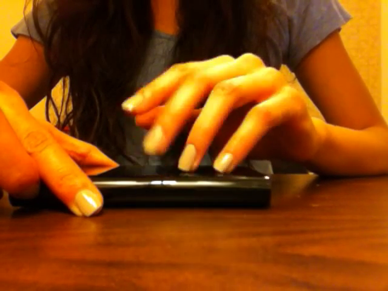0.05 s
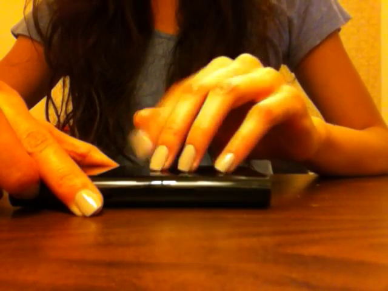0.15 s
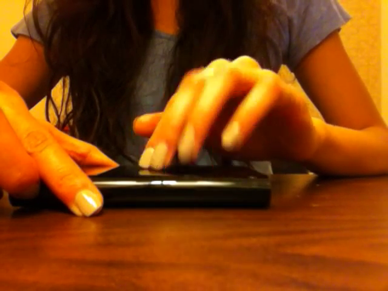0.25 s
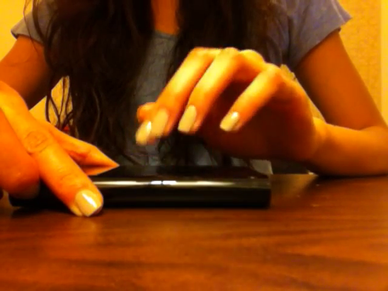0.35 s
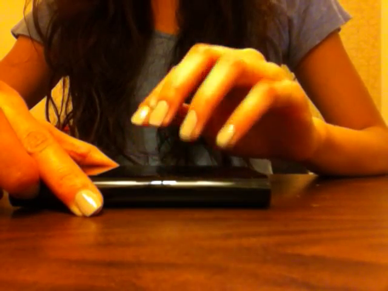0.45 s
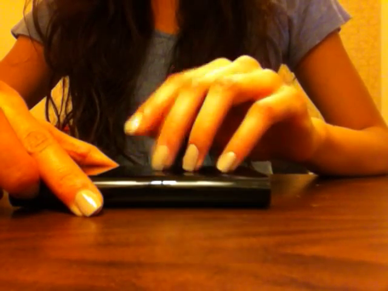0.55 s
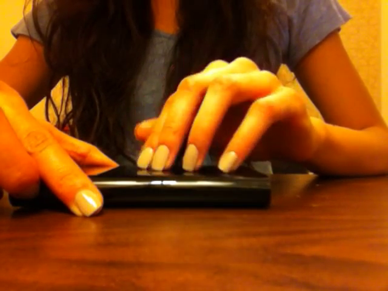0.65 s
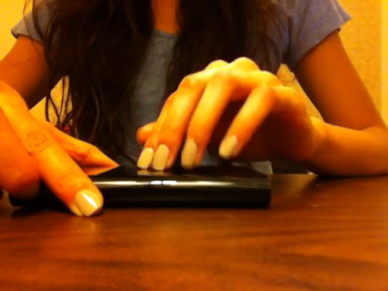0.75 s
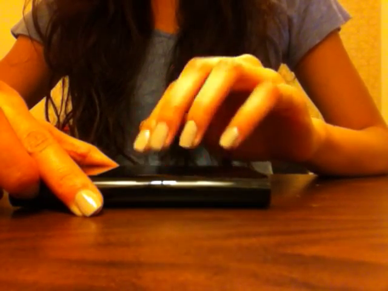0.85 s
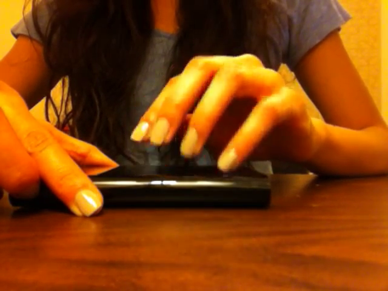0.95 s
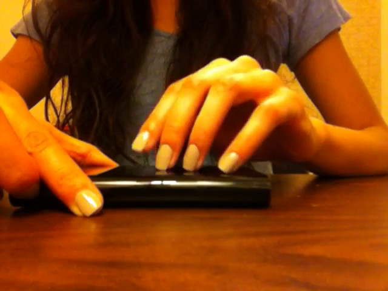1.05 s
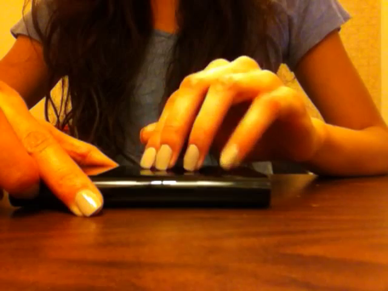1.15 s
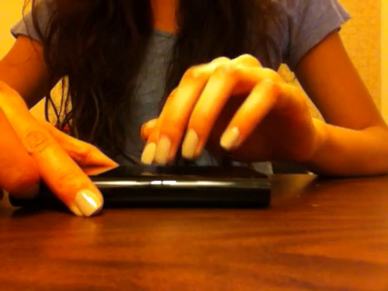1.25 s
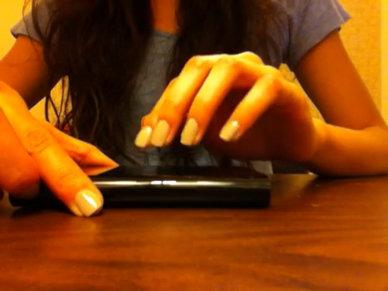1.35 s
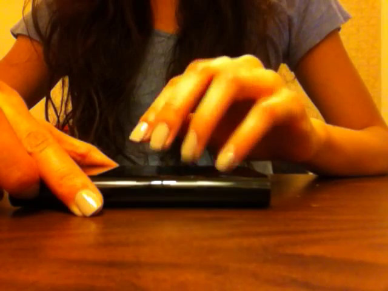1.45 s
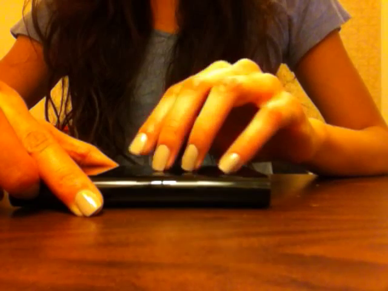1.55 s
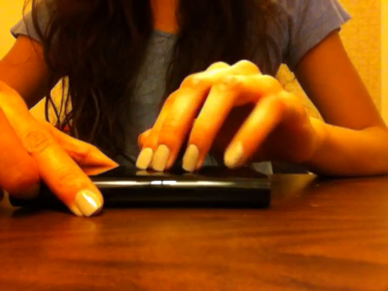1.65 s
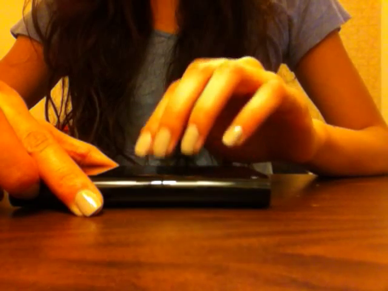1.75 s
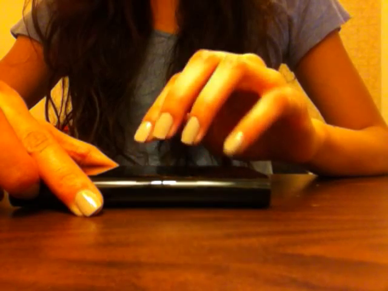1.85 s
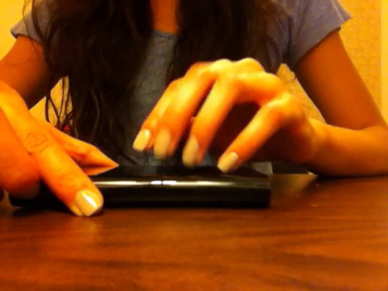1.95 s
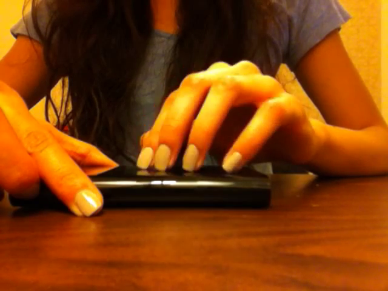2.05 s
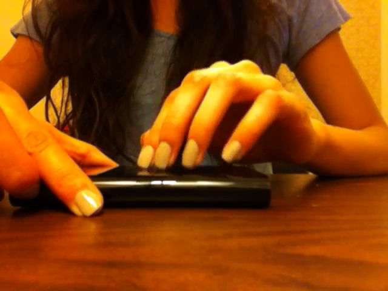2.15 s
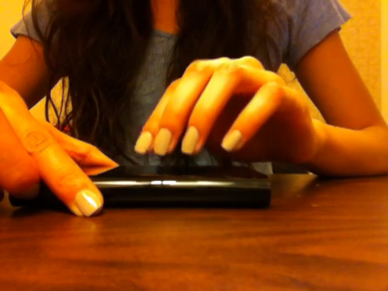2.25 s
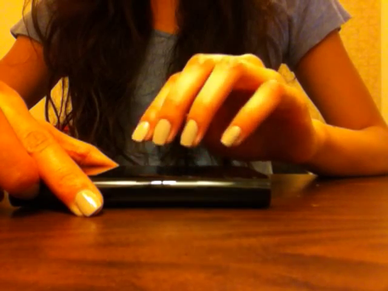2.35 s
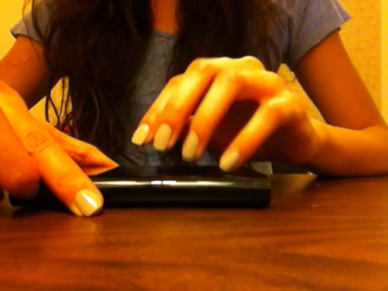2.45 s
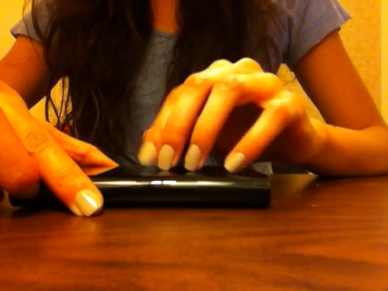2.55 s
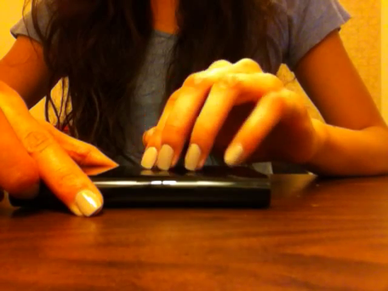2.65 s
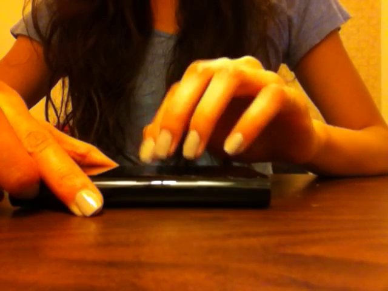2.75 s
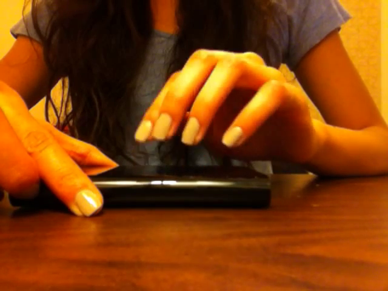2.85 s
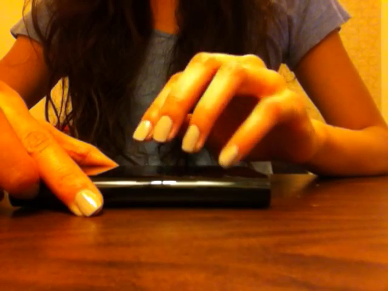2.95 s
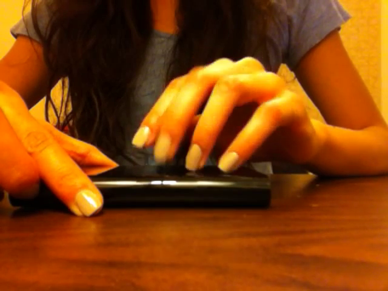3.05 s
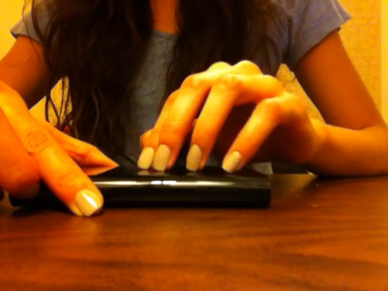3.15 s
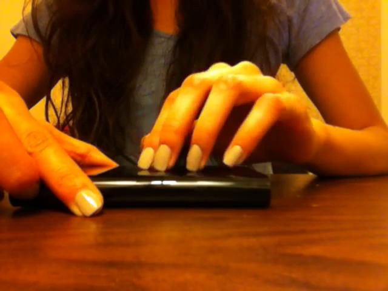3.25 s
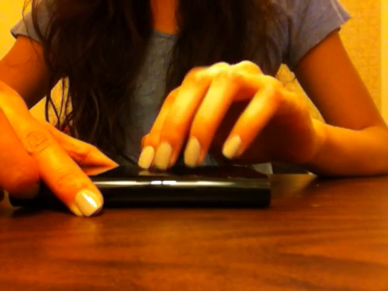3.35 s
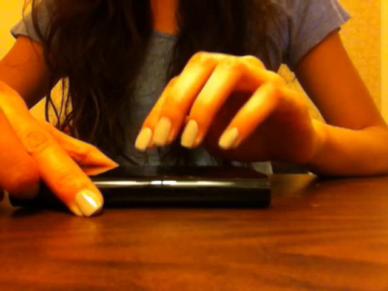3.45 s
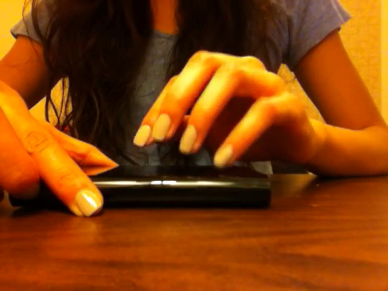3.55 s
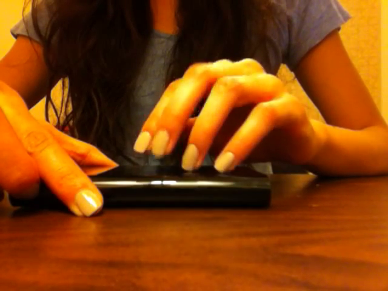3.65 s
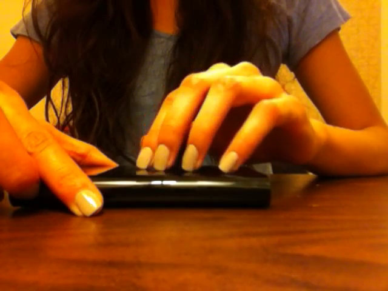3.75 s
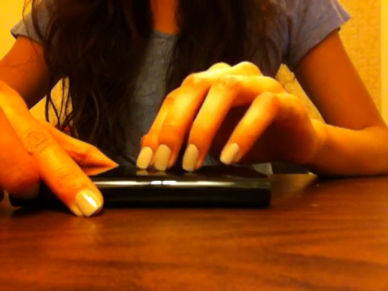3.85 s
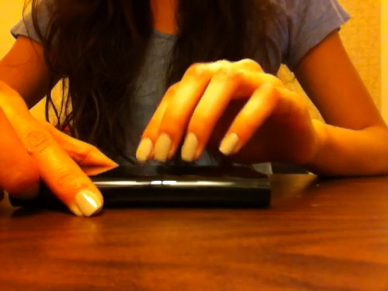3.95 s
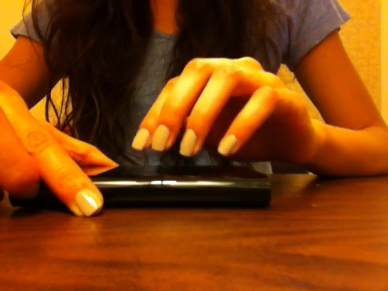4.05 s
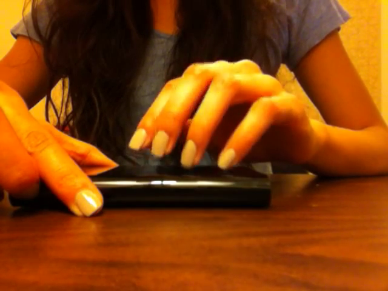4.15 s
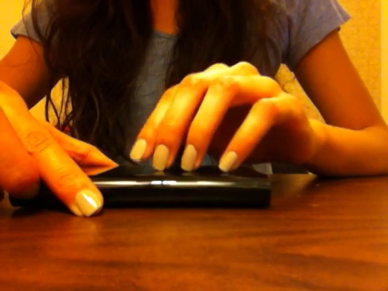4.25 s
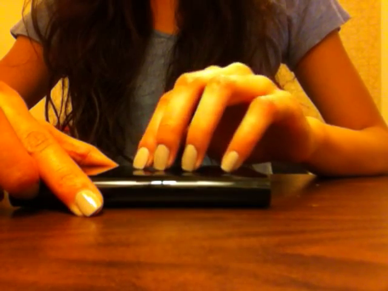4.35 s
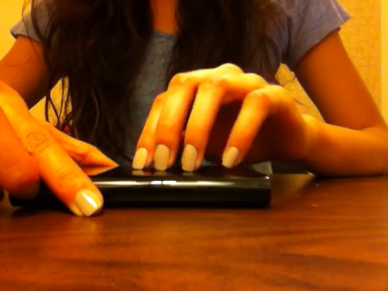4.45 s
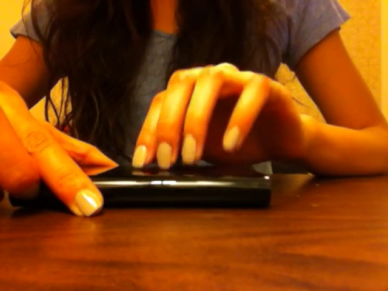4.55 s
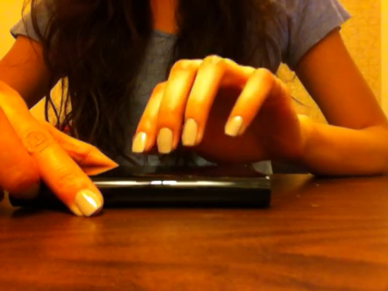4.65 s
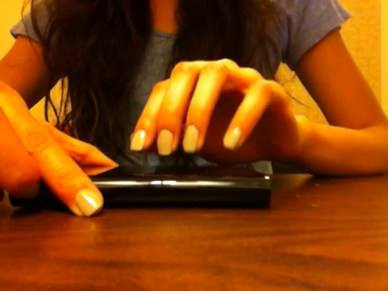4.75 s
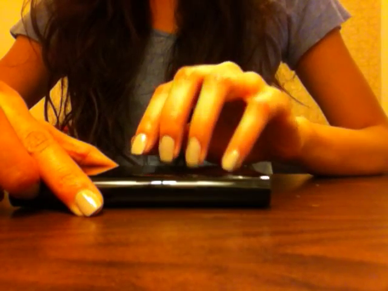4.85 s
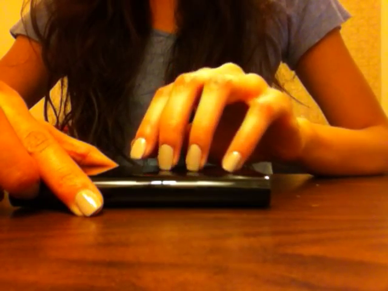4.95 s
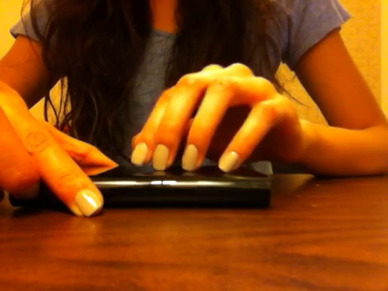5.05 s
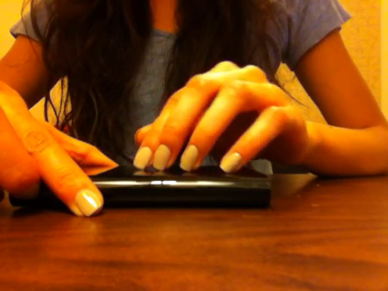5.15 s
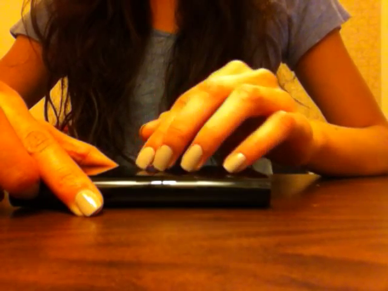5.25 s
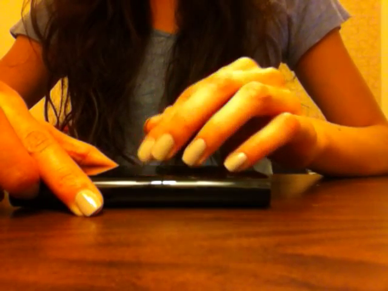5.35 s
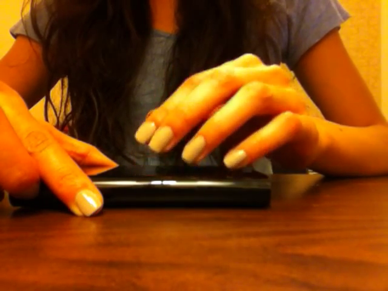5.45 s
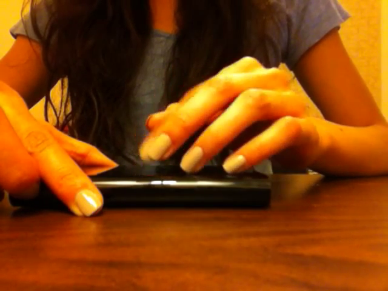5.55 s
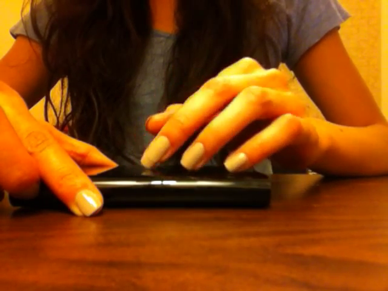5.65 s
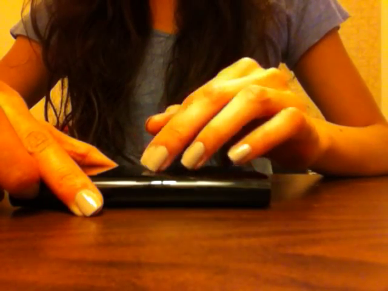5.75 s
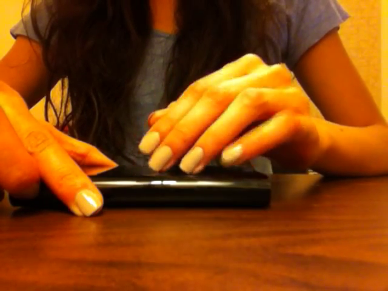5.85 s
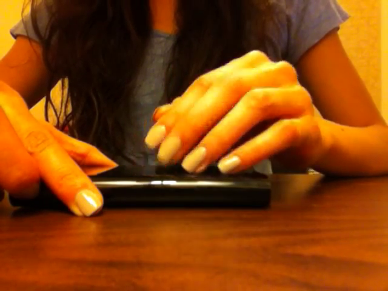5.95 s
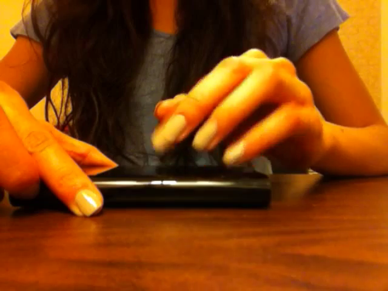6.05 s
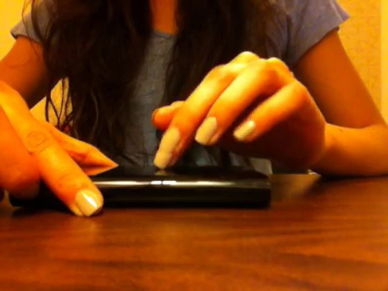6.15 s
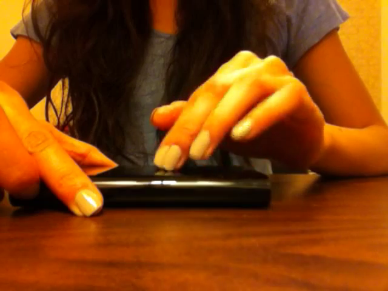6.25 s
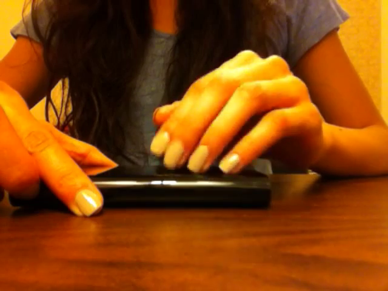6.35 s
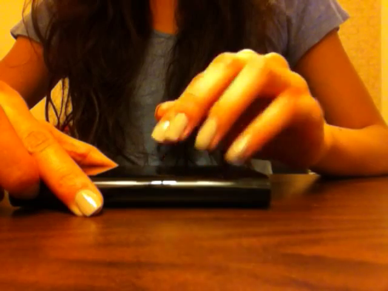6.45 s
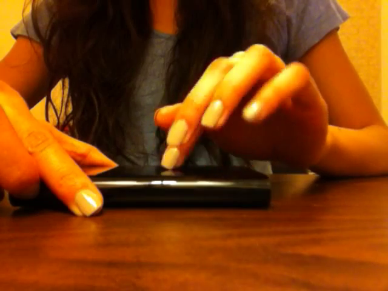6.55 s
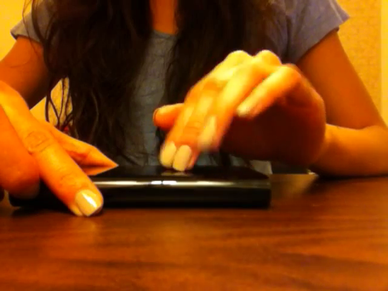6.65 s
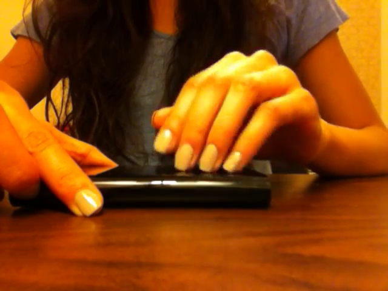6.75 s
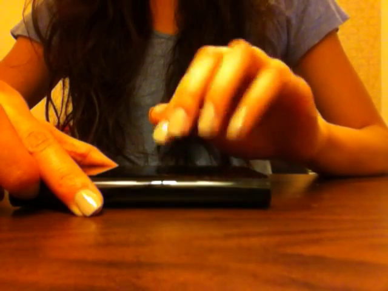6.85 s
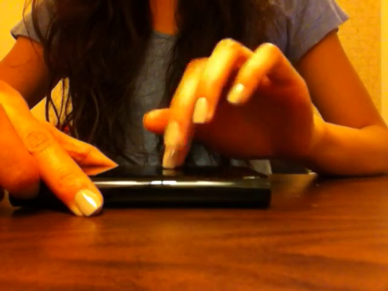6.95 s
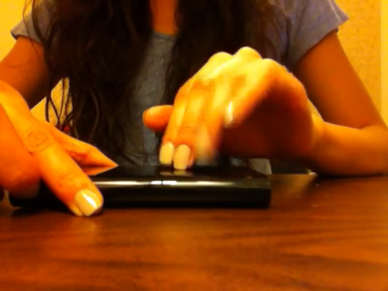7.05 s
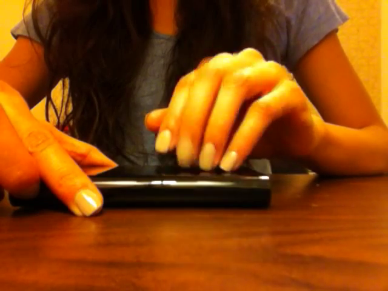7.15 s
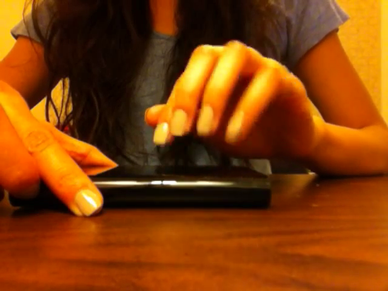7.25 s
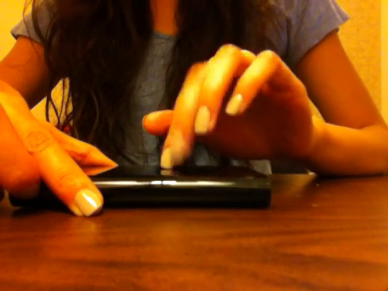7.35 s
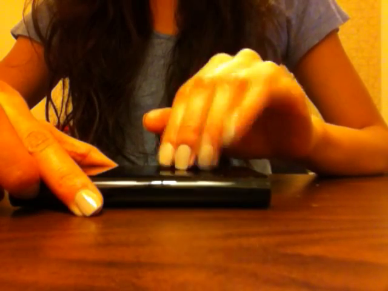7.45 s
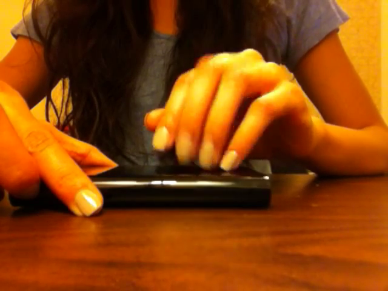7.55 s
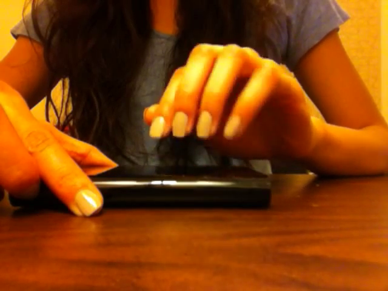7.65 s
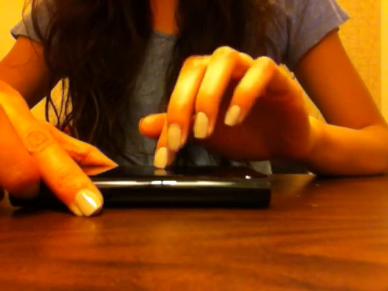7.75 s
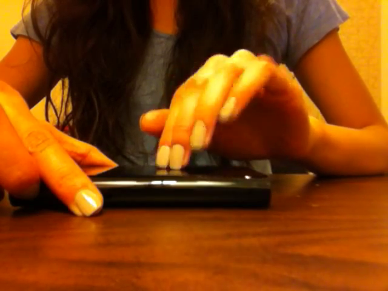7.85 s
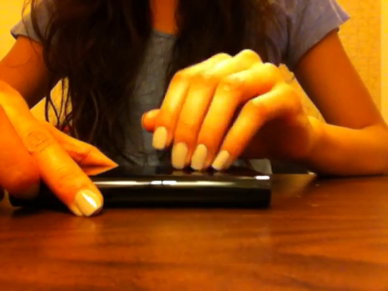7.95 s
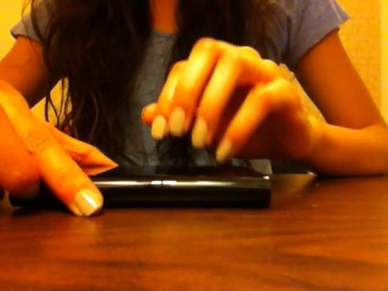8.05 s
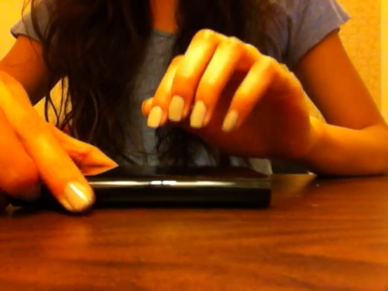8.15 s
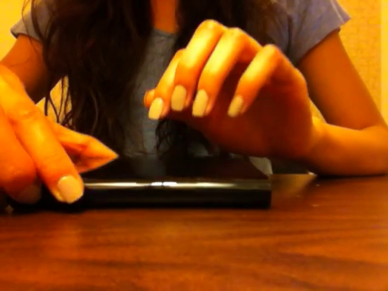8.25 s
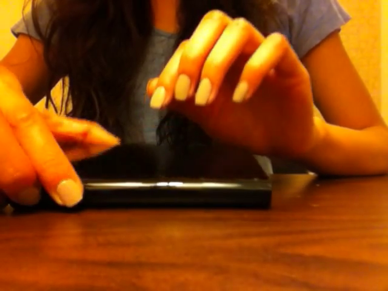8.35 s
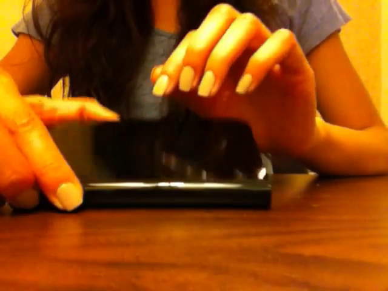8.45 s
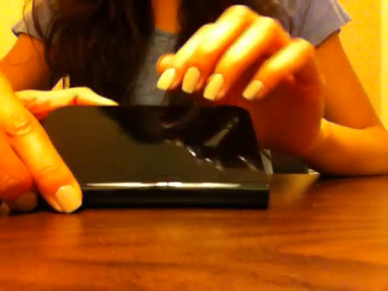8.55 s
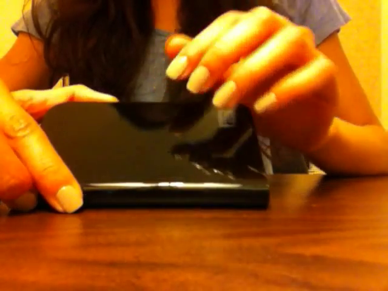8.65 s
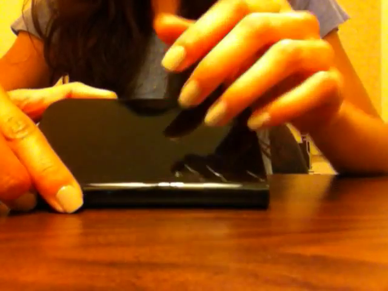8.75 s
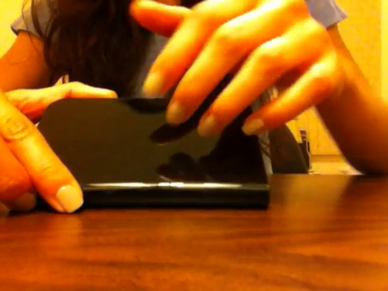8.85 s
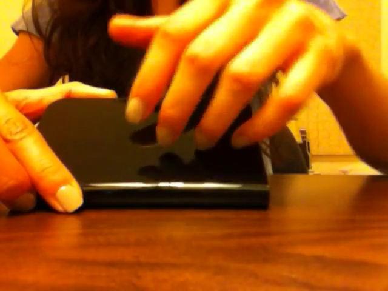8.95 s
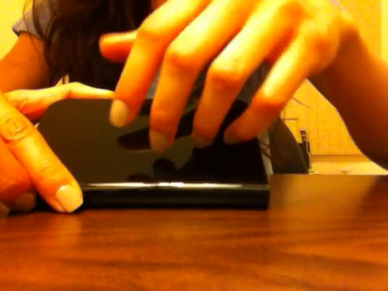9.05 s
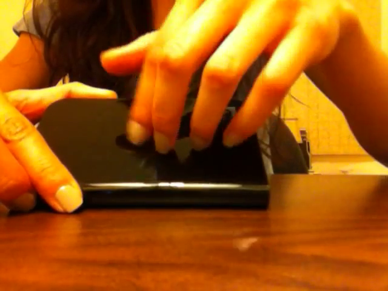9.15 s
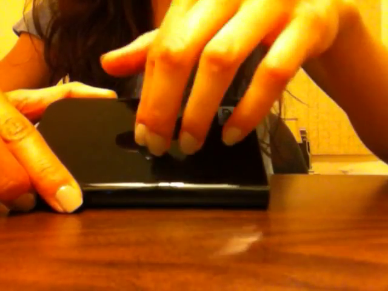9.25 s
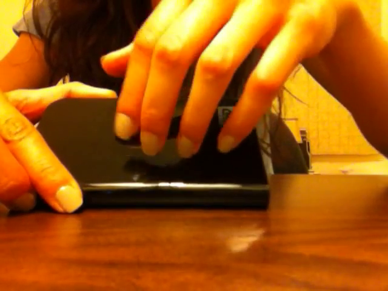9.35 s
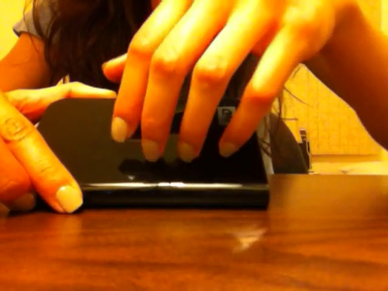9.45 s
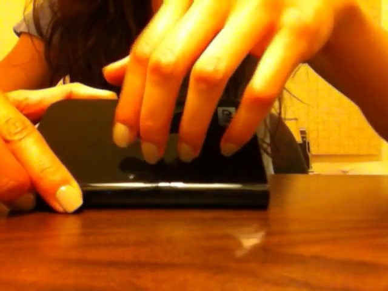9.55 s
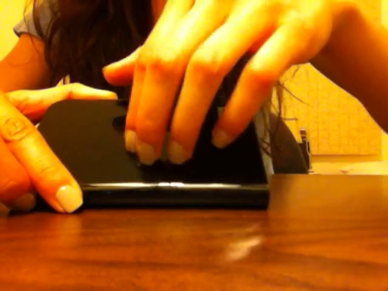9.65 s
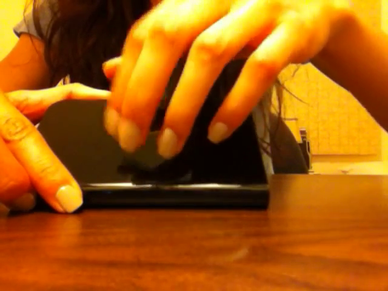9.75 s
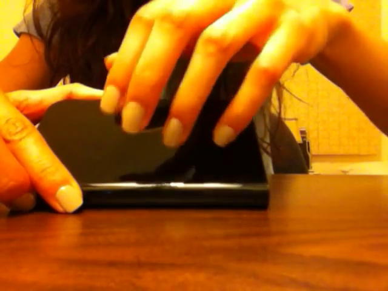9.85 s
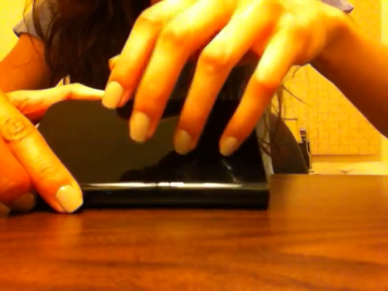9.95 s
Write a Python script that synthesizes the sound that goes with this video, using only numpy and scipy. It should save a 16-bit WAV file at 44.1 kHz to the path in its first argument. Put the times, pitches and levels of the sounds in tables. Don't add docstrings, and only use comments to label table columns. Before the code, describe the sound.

Crisp, dry nail clicks roll little finger to index on a phone's glass, reverse and grow louder, then thin out in a small quiet room.

```python
import sys
import numpy as np
from scipy import signal
from scipy.fft import rfft, irfft
from scipy.io import wavfile
from scipy.ndimage import uniform_filter1d, minimum_filter1d

SR = 44100
rng = np.random.default_rng(int(sys.argv[2]) if len(sys.argv) > 2 else 0)


def output_pcm(signal):
    pcm = np.clip(np.atleast_2d(signal).T, -1, 1) * 32767
    wavfile.write(sys.argv[1], SR, np.round(pcm).astype(np.int16))


def amplitude_ratio(level_db):
    exponent = np.asarray(level_db, float) / 20
    return 10 ** exponent


N = 440559

# frequency in Hz, density in dB per Hz.
NOISE_SHAPE = [(12, -59), (20, -32), (48, -12), (151, -4.5), (174, -5), (267, -10.5), (299, -3),
               (325, -11.5), (644, -16), (1280, -20), (2010, -22), (3660, -23.5), (15200, -27),
               (16500, -41), (18000, -23.5)]
NOISE_DB = -53.5
# frequency in Hz, line width in Hz, level in dB.
HUM_LINES = [
    (119, 14, -71),
    (301, .4, -65),
    (14993, .05, -78),
]

# frequency in Hz, level in dB, T60 in seconds,
# change in dB once the phone is tilted off the table.
PLATE_MODES = [(3237, -9, 0.015, -7), (3450, -4.5, 0.013, -8), (3523, -15.5, 0.033, -5)]
THUD_MODES = [(116, -7, 0.028, 4.5), (230, -9.5, 0.04, -27), (292.3, -0.5, 0.043, 8.5),
              (375, 0.5, 0.044, 6.5), (443.2, 3.5, 0.057, -1), (526, -0.5, 0.033, -4)]
BEND_MODES = [(668, -1.8, 0.0074, .1), (715, -2, 0.021, .1), (789.6, 1.54, 0.03, .1)]
TWIST_MODES = [(1008, 3, 0.019, 0.11), (1167, 1.5, 0.012, 0.11), (2381, 1.5, 0.021, 0.11)]
SECOND_BEND_MODES = [(1469, -24, 0.073, 16.5), (1574, 4, 0.017, -3), (1770, -8.5, 0.02, 10),
                     (1885, -9.5, 0.033, -12)]
# low edge in Hz, high edge in Hz.
RADIATED_BANDS = [
    (3173, 3440),
    (118, 318),
    (506, 762),
    (764, 1156),
    (1160, 1622),
]
POLARITY = (1, -1, 1, 1, 1)
TILTED_FROM_S = 8.15

# frequency in Hz, level in dB, T60 in seconds.
CHATTER_MODES = [(4100, -17, 0.0062), (4686, -6, 0.0036), (5060, -16, 0.0029), (6380, -16, 0.0028),
                 (7610, -28, 0.012), (9300, -62, 0.0039), (9820, -29, 0.0064), (12500, -45, 0.0036),
                 (14400, -37, 0.0018)]
# frequency in Hz, T60 in seconds.
FINE_MODES = [(4100, 0.013), (4800, 0.0095), (5300, 0.0091), (5900, 0.017), (6800, 0.014), (7700, 0.02),
              (8700, .008), (10500, 0.014)]
# level of every fine mode in dB over the snap, one row per landing spot.
FINE_DB_BY_SPOT = [(-9.5, -23, -24, -15.5, -12, -31, -53, -35), (-18, -11, -22, -15, -30, -35, -42, -36),
                   (-36, -10, -21, -31, -32, -30, -42, -29), (-7, -16.5, -35, -17.5, -26, -19, -34, -35),
                   (-4.5, -13, -36, -16, -20, -27, -28, -27), (-28, -14, -25, -41, -34, -28, -34, -27),
                   (-14, -10.5, -12, -21, -22, -28, -34, -27), (-24, -19, -7, -28, -14, -27, -42, -37),
                   (-23, -14.5, -26, -15, -30, -15, -30, -21), (-19, -16, -26, -22, -24, -24, -30, -32),
                   (-36, -15, -17, -31, -27, -28, -37, -32), (-23, -5, -21, -28, -24, -22, -32, -24),
                   (-19, -26, -19, -22, -24, -24, -30, -32)]

# start in seconds, knock of the slab in dB, snap of the nail in dB.
LITTLE = [(.4372, -22, -21), (.8791, -29.5, -27.5), (1.3814, -23, -23), (1.8682, -32, -38),
          (2.4108, -28.5, -28), (2.9377, -32.5, -32), (3.53, -30.5, -30), (4.131, -36, -32),
          (4.808, -26.5, -27.5)]
RING = [(0.4493, -25, -22), (0.9258, -30, -26), (1.4073, -28.5, -24.5), (1.9315, -31.5, -26),
        (2.448, -32, -27), (2.9999, -30, -25.5), (3.6079, -44.5, -42), (4.1243, -36.5, -38),
        (4.8298, -39.5, -50)]
MIDDLE = [(0.4817, -24.5, -20), (0.9561, -24.5, -18), (1.4462, -28.5, -20), (1.9451, -23, -17.5),
          (2.4824, -27.5, -21), (3.045, -31, -22.5), (3.673, -30, -24), (4.1783, -31, -24),
          (4.8981, -38, -34.5)]
INDEX = [(0.5754, -35.5, -36.5), (1.0638, -33.5, -26.5), (1.5295, -27.5, -22.5), (1.9927, -30.5, -25),
         (2.5303, -32, -26), (3.0989, -26.5, -20), (3.6954, -30, -27.5), (4.2574, -32.5, -27.5),
         (5.0368, -34.5, -29), (9.1226, -33, -28.5), (9.5485, -26.5, -19)]
INDEX_BACK = [(5.5368, -30, -30), (6.0591, -26.5, -24.5), (6.4701, -21.5, -19), (6.869, -23.5, -19.5),
              (7.267, -22, -17.5), (7.6956, -21.5, -17.5)]
MIDDLE_BACK = [
    (5.68, -36, -28),
    (6.1548, -32, -21.5),
    (6.5669, -28.5, -19),
]
MIDDLE_FAR = [
    (6.9498, -28, -21.5),
    (7.33, -24, -16),
    (7.7606, -22.5, -16),
]
RING_BACK = [(5.7512, -41.5, -42.5), (5.8302, -38.5, -37), (6.2417, -27.5, -26.5), (6.6509, -22.5, -22.5),
             (7.0302, -21, -23), (7.4166, -18, -19), (7.85, -18, -19)]
LITTLE_BACK = [
    (6.697, -60, -44),
    (7.067, -22.5, -21),
    (7.4521, -21, -22.5),
    (7.7837, -56, -45),
    (7.895, -23.5, -23),
]
TOUCHES = [
    (0.0208, -49, -52.5),
    (0.1046, -41.5, -44),
    (5.46, -52.5, -51),
    (8.0596, -41, -45),
    (8.1264, -56, -57),
]
TILTED_FLAT = [
    (8.8908, -29.5, -33),
    (9.0403, -25, -21.5),
    (9.3867, -33.5, -33.5),
    (9.42, -38.5, -33),
]
TILTED_EDGE = [
    (8.9312, -34.5, -41),
    (9.3987, -34.5, -32),
    (9.8913, -30, -30),
]
SET_DOWN = [
    (8.2014, -36.5, -61),
]
# table thud in dB, first bend in dB, twist in dB, second bend in dB,
# plate ring in dB over the snap, snap tilt in dB per octave.
SPOTS = [(-15, -18, -1.8, -6, -5.5, 0), (0.8, -1, 1.5, 0.5, -1.5, -4), (0.45, 2.1, -6, -2.5, 4, -14),
         (-9.5, 3, -2.5, -4, -3.5, -3), (-9, 2.9, -1, 1, -2.2, 0), (0.9, 3.5, 2.5, 2.5, 6, -33),
         (-0.2, 2, 0.5, 1.5, -5.5, -5), (-8.5, -9.5, -0.5, -4.5, -3.5, -3), (-16, -17, -1.4, -3, -7.5, 1.2),
         (-3.5, 0, .1, -1, 2.5, 3), (-2.5, -3.5, -3.5, -4, 5.5, -17), (-10.5, -9, -2, 0.5, 1.5, 6),
         (-3, -12, -2.5, -7, 0, -5)]

# delay in seconds, level in dB.
ECHOES = [(.0085, -21.5), (0.0152, -28.5), (0.022, -38), (.025, -46), (0.032, -28)]
# frequency in Hz, level in dB, T60 in seconds.
TAIL = [(109, -38, 0.73), (259, -31, 0.18), (482, -37, 0.24), (1166, -38, 0.26), (1960, -39.5, 0.24),
        (4400, -43, 0.24), (7100, -42, 0.26)]
# frequency in Hz, level in dB, T60 in seconds.
STANDING_WAVES = [(120.2, -51.5, 0.2), (310.5, -42.5, 0.063), (389.4, -57, 0.25), (447.5, -59, 0.23),
                  (528.7, -42, 0.1), (673, -66.5, 0.29), (773, -65, 0.25), (803, -43, 0.068)]
# time in seconds, level in dB.
BRUSH_ENVELOPE = [
    (8.64, -85),
    (8.71, -53.5),
    (8.78, -72),
]


def rms_one(x):
    return x / np.sqrt(np.mean(x ** 2) + 1e-20)


def ring(clicks, hz, t60):
    radius = amplitude_ratio(-60 / (t60 * SR))
    turn = 2 * np.pi * hz / SR
    return signal.lfilter([.5, 0, -.5], [1, -2 * radius * np.cos(turn), radius * radius], 2 * clicks + 1e-18)


def band(x, low_hz, high_hz, order=2):
    return signal.sosfilt(signal.butter(order, [low_hz, high_hz], "band", fs=SR, output="sos"), x)


def cut(x, kind, hz, order):
    return signal.sosfilt(signal.butter(order, hz, kind, fs=SR, output="sos"), x)


def floor():
    hz = np.arange(N // 2 + 1) * SR / N + 1
    shape_hz, shape_db = np.transpose(NOISE_SHAPE)
    shape = amplitude_ratio(np.interp(np.log(hz), np.log(shape_hz), shape_db))
    out = amplitude_ratio(NOISE_DB) * rms_one(irfft(rfft(rng.standard_normal(N)) * shape, N))
    for line_hz, width_hz, level_db in HUM_LINES:
        peak = 1 / (1 + ((hz - line_hz) * 2 / width_hz) ** 2)
        out += amplitude_ratio(level_db) * rms_one(irfft(rfft(rng.standard_normal(N)) * peak, N))
    return out


def contacts():
    brighter_per_db, usual_snap_db = 1.42, -25.5
    strikes_by_spot = (LITTLE, RING, MIDDLE, INDEX, INDEX_BACK, MIDDLE_BACK, MIDDLE_FAR, RING_BACK,
                       LITTLE_BACK, TOUCHES, TILTED_FLAT, TILTED_EDGE, SET_DOWN)
    rows = []
    for spot, strikes in enumerate(strikes_by_spot):
        thud, bend, twist, second, plate, tilt = SPOTS[spot]
        for s, knock_db, snap_db in strikes:
            snap_tilt = tilt + brighter_per_db * (snap_db - usual_snap_db)
            rows.append((s, snap_db + plate, knock_db + thud, knock_db + bend, knock_db + twist,
                         knock_db + second, snap_db, snap_tilt, spot))
    return np.array(sorted(rows))


def taps():
    thud_lag_s = 0.00037
    rows, out = contacts(), np.zeros(N)
    at = np.round(rows[:, 0] * SR).astype(int)
    tilted = rows[:, 0] > TILTED_FROM_S
    scatter_db = iter(1.3 * rng.standard_normal((len(at), 20)).T)
    families = (PLATE_MODES, THUD_MODES, BEND_MODES, TWIST_MODES, SECOND_BEND_MODES)
    for family, level_db, edges, sign in zip(families, rows.T[1:], RADIATED_BANDS, POLARITY):
        body = np.zeros(N)
        lag = (sign < 0) * round(thud_lag_s * SR)
        for hz, mode_db, t60, tilted_db in family:
            clicks = np.zeros(N)
            clicks[at + lag] = amplitude_ratio(level_db + mode_db + tilted * tilted_db + next(scatter_db))
            body += ring(clicks, hz, t60)
        out += sign * band(body, *edges, order=1)
    lifted = cut(out, "high", 240, 3)
    return np.where(np.arange(N) > TILTED_FROM_S * SR, lifted, out)


def cracks():
    chatter_db = -3.5
    s, *_, snap_db, tilt, _ = contacts().T
    out, t = np.zeros(N), np.arange(SR // 100) / SR
    at = np.round(s[:, None] * SR).astype(int) + np.arange(len(t))
    release = np.clip((.006 - t) / 0.0019, 0, 1)
    rough = rng.standard_normal(at.shape) * amplitude_ratio(-12 - 60 * t / 0.023) * release
    rough[:, 0] = 1
    chance_db = 1.5 * rng.standard_normal((len(s), len(CHATTER_MODES)))
    for k, (hz, mode_db, t60) in enumerate(CHATTER_MODES):
        strength = amplitude_ratio(snap_db + chatter_db + mode_db + tilt * np.log2(hz / 5000) + chance_db[:, k])
        contact = np.bincount(at.ravel(), (strength[:, None] * rough).ravel(), N)
        out += ring(contact[:N], hz, t60)
    return band(out, 2370, 17800)


def glass():
    push_db = -1
    rows = contacts()
    at, clicks = np.round(rows[:, 0] * SR).astype(int), np.zeros(N)
    clicks[at] = amplitude_ratio(rows[:, 2] + push_db)
    out = rms_one(band(clicks, 700, 2500, order=1)) * np.sqrt(8.0 * np.mean(clicks ** 2))
    spot_db = np.array(FINE_DB_BY_SPOT)[rows[:, -1].astype(int)]
    level_db = rows[:, 6:7] + spot_db + 1.5 * rng.standard_normal((len(at), len(FINE_MODES)))
    for (hz, t60), mode_db in zip(FINE_MODES, level_db.T):
        clicks[at] = amplitude_ratio(mode_db)
        out += ring(clicks, hz, t60)
    return cut(out, "low", 9000, 2)


def room(x):
    t = np.arange(SR // 2) / SR
    reply = np.zeros(len(t))
    for lag_s, echo_db in ECHOES:
        reply[round(lag_s * SR)] = amplitude_ratio(echo_db)
    reply = band(reply, 88, 4900)
    build_up = np.clip((t - .003) / 0.0075, 0, 1)
    for hz, level_db, t60 in TAIL:
        noise = band(rng.standard_normal(len(t)), hz * 0.83, hz * 1.5)
        reply += noise * amplitude_ratio(level_db - 60 * t / t60) * build_up
    for hz, level_db, t60 in STANDING_WAVES:
        reply += np.sin(2 * np.pi * hz * t) * amplitude_ratio(level_db - 60 * t / t60) * build_up
    return signal.fftconvolve(x, reply)[:N]


def reflections(body, rough, fine):
    plate_held, chatter_sent_db, glass_sent_db = 0.35, 3, -3
    spread_t60_s, spread_db, spread_hz = 0.011, 4.5, 2700
    paths = 4
    sent = body - plate_held * band(body, 3180, 3200, order=1)
    sent = sent + amplitude_ratio(chatter_sent_db) * rough + amplitude_ratio(glass_sent_db) * fine
    starts = contacts()[:, 0] * SR - 2
    count = np.searchsorted(starts, np.arange(N))
    since_s = abs(np.arange(N) - starts[count - 1]) / SR
    treble = cut(sent, "high", spread_hz, 1)
    sent = sent + treble * (amplitude_ratio(spread_db - 60 * since_s / spread_t60_s) - 1)
    return sum(room(sent * (count % paths == k)) for k in range(paths))


def brush():
    s, level_db = np.transpose(BRUSH_ENVELOPE)
    gain = amplitude_ratio(np.interp(np.arange(N) / SR, s, level_db, -120, -120))
    return gain * rms_one(band(rng.standard_normal(N), 1300, 2800))


def scene():
    body, rough, fine = taps(), cracks(), glass()
    wet = reflections(body, rough, fine)
    return (body + rough + fine + wet + brush() + floor())[None]


def starve(x):
    ms = SR // 1000
    level_db = 10 * np.log10(uniform_filter1d(x ** 2, size=2 * ms) + 1e-12)
    coming_db = -minimum_filter1d(-np.roll(level_db, -12 * ms), size=14 * ms)
    near_db = -minimum_filter1d(-np.roll(level_db, -2 * ms), size=6 * ms)
    lost = .9 * uniform_filter1d(1. * (coming_db - near_db > 29), size=2 * ms)
    treble = signal.sosfiltfilt(signal.butter(2, 2300, "high", fs=SR, output="sos"), x)
    return x - lost * treble


def roll_off(x):
    return signal.sosfilt(signal.butter(12, 18470, fs=SR, output="sos"), x)


def record(dry):
    mix = cut(starve(dry[0])[None], "low", 17000, 6)
    return roll_off(mix)


dry = scene()
out = record(dry)
output_pcm(out)
```